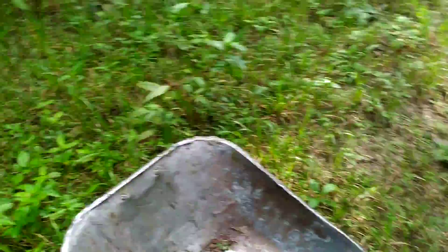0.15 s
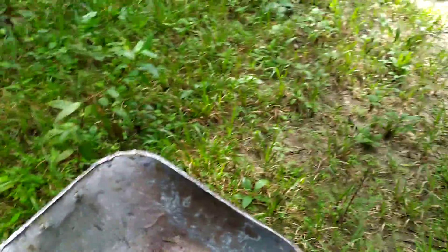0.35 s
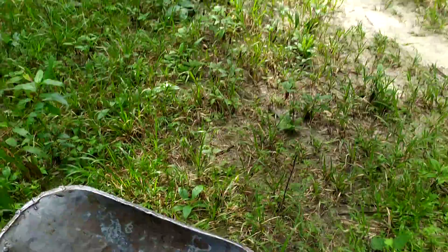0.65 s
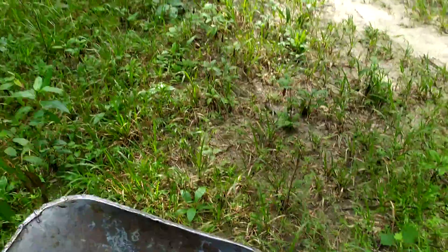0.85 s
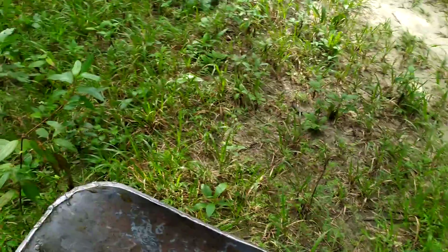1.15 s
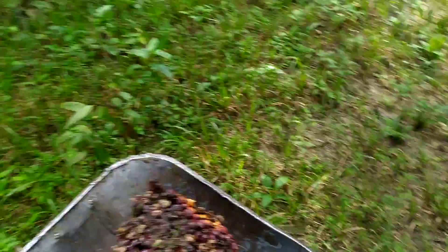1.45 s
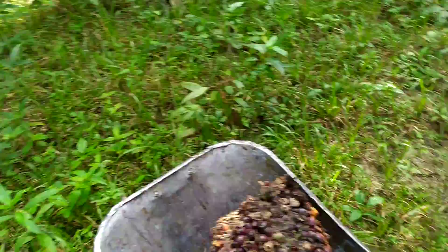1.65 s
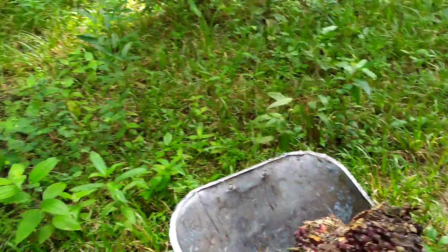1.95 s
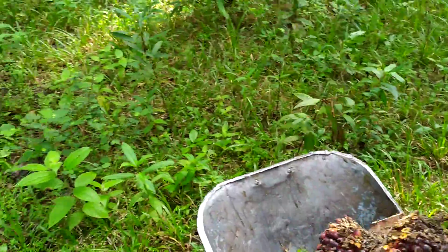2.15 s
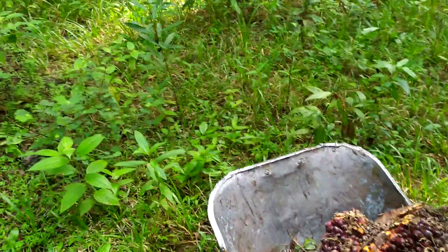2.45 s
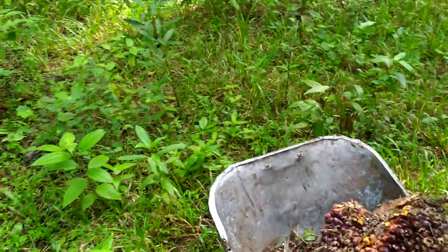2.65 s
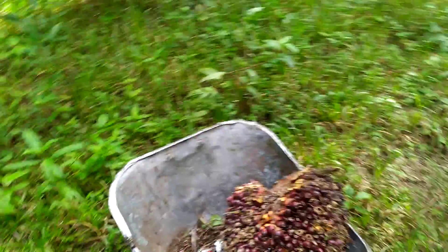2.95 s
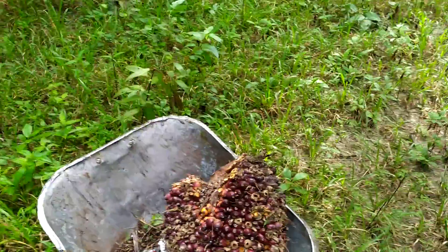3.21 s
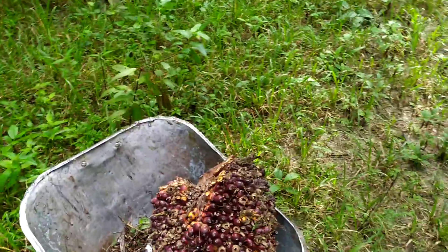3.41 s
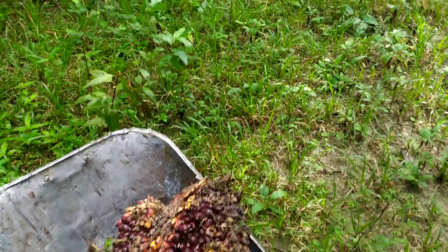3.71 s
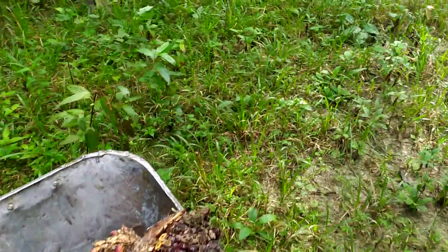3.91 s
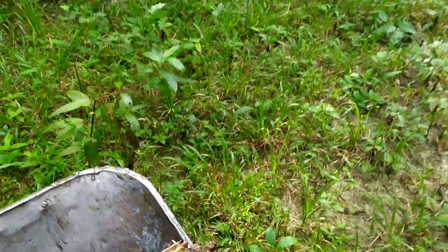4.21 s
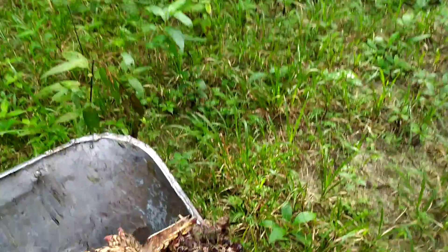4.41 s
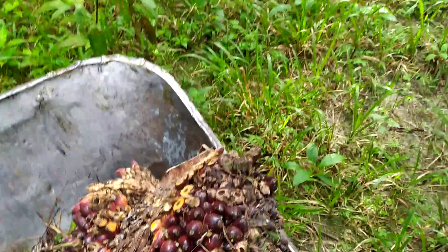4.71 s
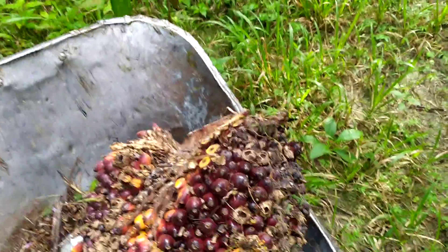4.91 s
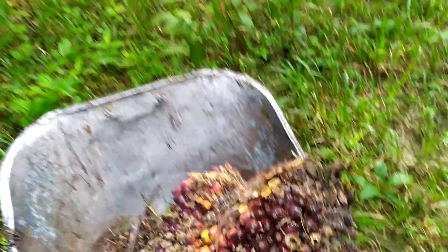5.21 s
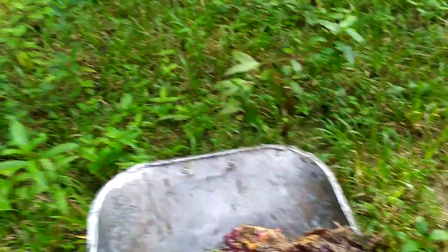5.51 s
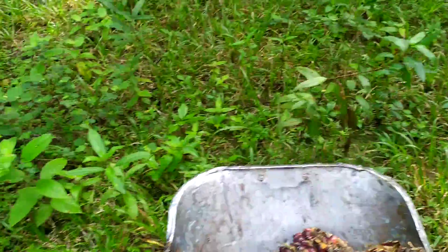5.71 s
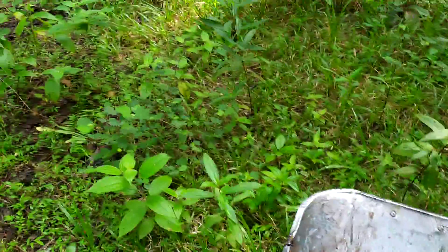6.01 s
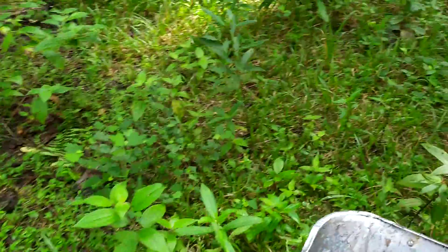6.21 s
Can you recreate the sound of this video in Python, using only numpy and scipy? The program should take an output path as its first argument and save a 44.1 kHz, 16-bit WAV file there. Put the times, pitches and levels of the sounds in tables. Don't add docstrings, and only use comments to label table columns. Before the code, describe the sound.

Outdoors in grass, loads bang into a hollow metal barrow with rattling fruit and grit, followed by a bright ringing tool clank and soft leafy swishes.

```python
import sys
import numpy as np
from scipy import signal
from scipy.io import wavfile
from scipy.ndimage import uniform_filter1d

SR = 44100
rng = np.random.default_rng(int(sys.argv[2]) if len(sys.argv) > 2 else 0)


def to_wav(sig):
    pcm = np.clip(np.atleast_2d(sig), -1, 1) * 32767
    pcm = np.round(pcm).astype(np.int16)
    wavfile.write(sys.argv[1], SR, pcm.T)


def invert_db(x):
    u = np.asarray(x, float) / 20
    return 10 ** u


N = 280476

# f/Hz, level/dB, ring time as a share of the blow's
TRAY_MODES = [(143.4, -11.5, 4.1), (163.2, -0.5, 0.65), (191, -3, 0.84), (212.3, -3.5, 1.4),
              (251, -11.5, 0.4), (258, 2.5, 0.45), (310, -11, 1.32), (355.8, -6, 1.12), (403.4, 0, 0.47),
              (451.3, -9.5, 0.71), (494, -13, 0.69), (569.6, -9, 0.51), (639, -11.5, 0.91),
              (704.3, -10, 0.51), (744, -10, 0.67), (807.4, -16, 0.83), (907, -19.5, 0.51),
              (1047, -21, 0.52), (942.3, -9, 0.51), (1180, -12.5, 0.35), (1390, -14.5, 0.36),
              (1550, -30, 0.68)]
# f/Hz, likeness (1 = the same, 0 = unrelated)
LIKENESS = [(35, 0.52), (70, 0.84), (150, 0.98), (300, 0.99), (600, 0.82), (1200, 0.45), (2500, -0.043),
            (6000, 0.15), (14000, -0.071)]
# t/s, tap level/dB, tilt/(dB per octave), left-right/dB
SNAPS = [(0.5945, -12, -1, 0), (0.9925, -29.5, -0.5, 5), (1.122, 2, 0, 5), (1.1266, -3, -4.5, -19),
         (1.4581, -42.5, -10, -2), (1.496, -28, 6, 2), (1.5864, -34, -2, 3.5), (1.5968, -28, 0.5, -4),
         (1.645, -28, 2.5, 0), (1.6784, -26.5, 1, -1), (1.691, -19.5, 3, 4), (1.7614, -37, -6, 1),
         (1.8442, -26.5, 1, 15), (1.8519, -20.5, -1, -4), (1.933, -42.5, -5, -1), (1.952, -39, 11, 1),
         (1.9979, -28.5, 0, 1.5), (2.1193, -34, -3, 3), (2.1805, -41, -6, 0), (2.2059, -24.5, 2, 9),
         (2.2614, -27, 1.5, 3), (2.3275, -31.5, -5.5, -2), (2.592, -29, -2, 2), (2.9403, -38, 8.5, -1),
         (2.9748, -40, 4, -2), (3.7782, -50.5, -2.5, 0), (4.4413, -2, 6.5, 38), (4.7476, -35, -9, 3.5),
         (5.8297, -68.5, -14, -3), (6.0964, -34.5, 7, 2.5)]
# t/s, level/dB, smothering starts t/s, time to set in/s, loss away from 2.3 kHz/(dB per octave)
TOOL_BLOWS = [
    (4.072, -20, 4.2, .005, 0),
    (4.441, -11, 4.97, .2, 0),
    (4.222, -27, 4.3, .005, -18),
]


def rms_one(x):
    return x / np.sqrt(np.mean(x ** 2) + 1e-20)


def at_hz(points, hz):
    table_hz, values = np.array(points)[:, 0], np.array(points)[:, 1]
    return np.interp(np.log(hz), np.log(table_hz), values)


def likeness_at(hz):
    return np.clip(at_hz(LIKENESS, hz), -1, 1)


def drift(rate_hz):
    r = np.exp(-80 * np.pi * rate_hz / SR)
    wander = signal.lfilter([1], [1, -2 * r, r * r], rng.standard_normal(N // 40 + 2002))
    return rms_one(wander[2000:])


def filled(slow):
    return np.interp(np.arange(N) / 40, np.arange(len(slow)), slow)


def swells(rows, floor_db):
    t = np.arange(N // 40 + 2) * 40 / SR
    power = sum(invert_db(2 * db - 20 * ((t - s) / fall_s) ** 2) for s, db, fall_s, *_ in rows)
    return filled(10 * np.log10(power + invert_db(2 * floor_db)))


def add(out, s, sound):
    i = round(s * SR)
    out[..., i:i + sound.shape[-1]] += sound[..., :N - i]


def grit(per_s, spread_db):
    sizes = invert_db(spread_db * np.minimum(rng.exponential(1, (2, N)), 5)) * rng.standard_normal((2, N))
    hits = rng.random((2, N)) < per_s / SR
    return rms_one(sizes * hits + 1e-9)


def bands(drives, low_hz, top_hz, gain, step=1 / 2):
    out = 0
    edges = low_hz * 2 ** np.arange(0, np.log2(top_hz / low_hz) + .01, step)
    for k, (low, high) in enumerate(zip(edges, edges[1:])):
        band = signal.butter(2, [low, high], "band", fs=SR, output="sos")
        mid, side = signal.sosfilt(band, drives[k % 2])
        hz = np.sqrt(low * high)
        alike = likeness_at(hz)
        mid, side = np.sqrt(1 + alike) * mid, np.sqrt(1 - alike) * side
        out = out + gain(hz) * np.array([mid + side, mid - side])
    return out


def damped(hz, gains, t60, length_s):
    t = np.arange(round(length_s * SR)) / SR
    phase = np.outer(2 * np.pi * hz, t).astype(np.float32)
    decay = np.exp(np.outer(-np.log(1000) / t60, t).astype(np.float32))
    return gains.real @ (decay * np.sin(phase)) + gains.imag @ (decay * np.cos(phase))


def sides(hz, chance):
    return np.exp(.5j * np.arccos(likeness_at(hz)) * chance * [[1], [-1]])


def hiss(spectrum, drives, patchy_db, flicker_hz, layout, tilt_db=0):
    layouts = {"swish": (900, 17000, 1 / 2), "field": (131, 17000, 1 / 3), "rumble": (36, 150, 1 / 3)}
    low_hz, top_hz, step = layouts[layout]
    together = drift(3.0)

    def level(hz):
        flicker_db = patchy_db * (1.53 * together + drift(flicker_hz))
        return filled(invert_db(at_hz(spectrum, hz) + tilt_db * np.log2(hz / 8000) + flicker_db))
    return rms_one(bands(drives, low_hz, top_hz, level, step))


def field(white):
    # f/Hz, level/(dB per Hz)
    spectrum = [(71, -32), (120, -4.5), (231, -16), (355, -8.5), (789, -22), (3050, -18.5), (3950, -21.5),
                (4700, -6), (5080, -10.5), (5870, -4), (8840, -3), (9590, -27), (14200, -8), (15000, -13),
                (16000, -39)]
    return invert_db(-55.5) * hiss(spectrum, white, patchy_db=-1.4, flicker_hz=13.0, layout="field")


def insects(drive):
    choirs = [
        (4330, 4900, -70, 9.0, 1.5),
        (5620, 5950, -71, 6.4, 4.0),
        (6850, 7200, -73, 4.0, 2.0),
    ]
    wing_strokes_per_s, buzz_db = 91, 3.0
    out, t = 0, np.arange(N) / SR
    buzz = buzz_db * np.cos(2 * np.pi * wing_strokes_per_s * t)
    for low_hz, high_hz, db, per_s, depth_db in choirs:
        edges = signal.butter(4, [low_hz, high_hz], "band", fs=SR, output="sos")
        throb = depth_db * np.cos(2 * np.pi * per_s * (t - 3.1))
        out = out + invert_db(db + throb + buzz) * rms_one(signal.sosfilt(edges, drive))
    return out


def rumble(white):
    # f/Hz, level/(dB per Hz)
    spectrum = [(18, -35), (30, -3), (43, -8.5), (59, -7.5), (69, -2.5), (81, -24.5), (102, -17),
                (130, -22), (170, -52), (290, -120)]
    # t/s, level/dB, time to fall 10 dB/s
    jolts = [
        (0.0, -43.5, 0.073),
        (0.66, -40, 0.041),
        (1.12, -44, 0.23),
        (2.07, -63, 0.11),
        (2.48, -57.5, 0.083),
        (4.0, -49, 0.077),
        (4.11, -34, 0.071),
        (4.5, -48, 0.094),
        (4.94, -49, 0.1),
        (6.1, -71, 0.2),
    ]
    noise = hiss(spectrum, white, patchy_db=0.95, flicker_hz=4.0, layout="rumble")
    return invert_db(swells(jolts, floor_db=-60.5)) * noise


def rolling(t60):
    # t/s, level/dB
    busyness = [(0.0, -51.5), (0.5, -59.5), (0.74, -40.5), (1.031, -52), (1.252, -46), (1.332, -20.5),
                (1.47, -49.5), (2.36, -47.5), (2.699, -59), (3.449, -59.5), (3.72, -85), (4.09, -78),
                (4.23, -39.5), (4.5, -78), (4.6, -28), (4.941, -50.5), (5.6, -52), (6.36, -49)]
    roll_db = np.interp(np.arange(N) / SR, *np.transpose(busyness))
    taps, out = grit(900.0, spread_db=2), 0
    for k, (hz, level_db, share) in enumerate(TRAY_MODES):
        r, w = invert_db(-60 / (t60 * share * SR)), 2 * np.pi * hz / SR
        ring = signal.lfilter([0, np.sin(w)], [1, -2 * r * np.cos(w), r * r], taps)
        alike = at_hz(LIKENESS, hz)
        mid, side = np.sqrt(1 + alike) * ring[k % 2], np.sqrt(np.abs(1 - alike)) * ring[1 - k % 2]
        out = out + invert_db(0.93 * level_db) * np.array([mid + side, mid - side])
    murmur = rms_one(out)
    deep = signal.sosfiltfilt(signal.butter(2, 270, fs=SR, output="sos"), murmur)
    light = np.clip((-45.5 - roll_db) / 8.0, 0, .9)
    return invert_db(roll_db) * (murmur - light * deep)


def swish(husks):
    # f/Hz, level/(dB per Hz)
    spectrum = [(530, -35), (900, -17), (1190, -13), (1510, -12), (1850, -12), (5750, -14), (9200, -9.5),
                (15100, -15.5), (16000, -19)]
    # t/s, level/dB, time to fall 10 dB/s, tilt/(dB per octave)
    sweeps = [(0.2, -66, 0.66, 0.5), (0.74, -57, 0.23, 2), (1.28, -56.5, 0.2, -2), (2.0, -70, 0.87, -1),
              (3.6, -73.5, 0.12, 1), (4.36, -68.5, 0.15, -2), (5.2, -71, 0.35, -0.5),
              (5.56, -61, 0.21, 0.5), (5.68, -56, 0.093, 1), (5.97, -64, 0.17, -1), (6.2, -57, 0.14, 2),
              (6.33, -59, 0.17, 3)]
    tilt_db = np.interp(np.arange(N // 40 + 2) * 40 / SR, *np.transpose(sweeps)[[0, 3]])
    leaves = hiss(spectrum, husks, patchy_db=1.5, flicker_hz=4.5, layout="swish", tilt_db=tilt_db)
    catching_db = 2.5 * filled(drift(35.0))
    return invert_db(swells(sweeps, floor_db=-79.5) + 14.5 + catching_db) * leaves


def blows():
    # t/s, peak level/dB, t60/s, upper knock/dB
    landings = [(0.596, -4, 0.57, -8.5), (0.664, -20.5, 0.29, -5), (0.755, -19.5, 0.14, -24),
                (0.893, -27, 0.23, -17.5), (0.936, -38, 0.34, -23), (1.111, -9, 0.24, -16),
                (1.14, -4.5, 0.17, -10), (1.167, -4, 0.44, -11.5), (1.316, -7.5, 0.25, -15),
                (1.336, -15, 0.11, -7), (1.379, -18, 0.24, -4.5), (1.4592, -12.5, 0.076, -1),
                (2.42, -27, 0.32, -15), (4.08, 0.5, 0.32, -16), (4.215, -21.5, 0.45, -7),
                (4.313, -28.5, 0.27, -10.5), (4.44, -14.5, 0.79, -3), (4.45, -5.5, 0.23, 3),
                (4.464, -8.5, 0.56, -4), (4.512, -10, 0.14, 8), (4.553, -3.5, 0.22, -12),
                (4.604, -11, 0.23, -7.5), (4.68, -18, 0.23, -3), (4.722, -18, 0.48, -10.5),
                (4.747, -24, 0.32, 4), (4.789, -22.5, 0.52, -6), (4.93, -34, 0.44, -7),
                (1.182, -10, 0.16, -6), (1.2, -7.5, .11, -12), (1.221, -11.5, 0.19, -4),
                (1.244, -7, 0.099, -7), (1.269, -11, 0.12, -4.5), (0.696, -19, 0.14, -16),
                (0.721, -22.5, 0.13, -14)]
    # t/s, peak level/dB, colour f/Hz
    knocks = [(0.591, -21, 526), (0.989, -41, 620), (1.358, -18.5, 595), (1.591, -40, 383),
              (1.689, -33, 196), (1.758, -35.5, 320), (1.246, -14, 870), (1.85, -25.5, 366),
              (1.879, -32, 167), (1.995, -41, 310), (2.056, -41, 187), (2.116, -50, 388),
              (2.179, -36.5, 383), (2.209, -22.5, 398), (2.231, -25, 385), (2.26, -27, 474),
              (2.327, -30.5, 406), (2.594, -35, 370), (4.07, -16.5, 1130), (4.524, -7.5, 473),
              (5.222, -43.5, 367), (5.358, -39, 157), (5.602, -30, 380), (5.623, -34.5, 805),
              (5.696, -29.5, 416), (5.827, -42, 796), (6.214, -32.5, 258), (6.237, -36, 403),
              (5.56, -41.5, 334), (5.582, -38.5, 372), (1.095, -33.5, 450), (1.523, -38.5, 414),
              (3.49, -55, 503), (3.61, -57, 498), (3.813, -59.5, 520), (1.29, -23.5, 900), (1.4, -27, 930),
              (1.481, -27.5, 333), (6.26, -40, 890), (4.085, -19, 300), (4.12, -16.5, 650),
              (4.575, -23, 590), (4.83, -31, 500), (4.86, -28, 204), (4.9, -30, 203), (4.748, -25.5, 810)]
    empty_hz, loaded_hz, loaded_s = 197, 249.8, 1.1
    heavy = [(s, db, empty_hz if s < loaded_s else loaded_hz, t60, knock_db)
             for s, db, t60, knock_db in landings]
    light = [(s, db, hz, 0.2 + 0.1 * np.log2(hz / 350), -11.5) for s, db, hz in knocks]
    landed = np.sort([row[0] for row in heavy] + [N / SR])
    same_blow_s = 0.04
    return [(*row, landed[landed > row[0] + same_blow_s][0] - row[0]) for row in heavy + light]


def thuds(width_oct, spread_db, contact_cycles, knock_hz, knock_share):
    smother_s = 0.006
    out, (hz, level_db, share) = np.zeros((2, N)), np.transpose(TRAY_MODES)
    strikes = blows()
    chance = rng.standard_normal((len(strikes), 4, len(hz)))
    upper = hz > knock_hz
    upper_share = np.where(upper, knock_share * (knock_hz / hz) ** 0.4, 1)
    for (s, db, centre_hz, t60, knock_db, free_s), (strength, detune, side, sign) in zip(strikes, chance):
        mode_gain = invert_db(level_db + spread_db * strength)
        boom = mode_gain / (1 + (np.log2(hz / centre_hz) / width_oct) ** 2) ** 2
        knock = mode_gain * upper
        gains = boom / np.linalg.norm(boom) + invert_db(knock_db - 0.5) * knock / np.linalg.norm(knock)
        gains = invert_db(db - 1.5) * np.exp(2j * sign) * gains * sides(hz, side)
        t60 = np.clip(t60, .02, .5)
        ring = damped(hz * (1 + 0.021 * detune), gains, t60 * share * upper_share, 0.56 * t60)
        t = np.arange(ring.shape[1]) / SR
        contact = 1 - np.exp(-t * centre_hz / contact_cycles)
        choked = np.exp(-np.maximum(t - free_s, 0) / smother_s)
        fade = 1 - np.linspace(0, 1, len(t)) ** 4
        add(out, s, ring * contact * choked * fade)
    return out


def ticks(cycles, shortest_s):
    out, spread_hz = np.zeros((2, N)), np.geomspace(450, 15000, 24)
    chance = rng.standard_normal((len(SNAPS), 4, len(spread_hz)))
    for (s, db, tilt_db, pan_db), (strength, detune, side, sign) in zip(SNAPS, chance):
        dull_db = -11.5 - 2.07 * tilt_db
        hz = spread_hz * (1 + 0.15 * np.tanh(detune))
        db, pan_db = min(db, -9), np.clip(pan_db, -9, 9)
        level_db = db - 10.0 + (dull_db + 2.0) * np.log2(8000 / hz) / 2.5 + 1.9 * strength
        gains = np.sign(sign) * invert_db(level_db + pan_db * np.array([[.5], [-.5]])) * sides(hz, side)
        add(out, s, damped(hz, gains, shortest_s + cycles / hz, .05))
    return out


def bursts():
    # t/s, peak level/dB, tilt/(dB per octave), t60/s
    showers = [(0.5952, -4.5, 1.5, 0.24), (1.1112, -30, -13.5, 0.043), (1.1197, -2.5, -2.5, 0.3),
               (1.2433, -18, -2, 0.09), (1.329, -21, -1.5, 0.44), (1.3553, -19, -5.5, 0.14),
               (2.2044, -23, -2, 0.21), (2.2381, -20, -2, 0.16), (4.0722, -5.5, -1, 0.34),
               (4.215, -26, -2, 0.47), (4.444, -19, -12, 0.08), (4.514, -6, -3, 0.31),
               (4.6876, -31.5, -8.5, 0.085), (5.699, -35, 7.5, 0.21), (6.1885, -33.5, 3.5, 1),
               (6.2354, -32, -5.5, 0.23)]
    puffs = [(s, min(db - 2, -25.5), tilt_db, 0.17, pan_db) for s, db, tilt_db, pan_db in SNAPS]
    return [(*shower, 0.5) for shower in showers] + puffs


def cracks(husks):
    all_bursts = bursts()

    def envelope(hz):
        power = np.zeros((2, N))
        for s, db, tilt_db, t60, pan_db in all_bursts:
            t60 = np.clip(t60, .004, .8) * (hz / 4000) ** -.15
            t = np.arange(round(t60 * SR)) / SR
            colour_db = tilt_db * np.log2(hz / 5000) - 7.0 * max(np.log2(hz / 9000), 0)
            level_db = db - 12 + colour_db + pan_db * np.array([[.5], [-.5]])
            add(power, s, invert_db(2 * level_db) * invert_db(-120 * t / t60) * np.minimum(t / .0006, 1))
        return np.sqrt(power)
    return bands(husks, 530, 17000, envelope)


def tool(rattle_db):
    tones_hz = [1028, 1478, 1536, 1924, 2035, 2655, 3115, 3402, 3736, 4199, 5110, 6484, 6603, 7171, 7589,
                7730, 8847, 9886, 10010, 10713, 11470, 1479.3, 13492, 14000, 14390, 14650, 14980, 15247]
    # level/dB, t60/s
    on_load = [(7, 0.29), (-17, .3), (-5, 0.3), (-26, .3), (2, 0.44), (-7, 0.6), (-39.5, .2), (-22, 0.4),
               (-6, 0.4), (-21, 0.24), (-9, 0.17), (-14, 0.66), (-26, 0.41), (-25, .2), (-8, 0.22),
               (-18, 0.54), (-19, 0.31), (-12, 0.57), (-28, 0.17), (-13, 0.44), (-4, .2), (-30, .1),
               (-11, 0.24), (-21, .15), (-3, 0.33), (-26, .15), (-28.5, .1), (-7, .1)]
    # level/dB, t60/s, gain at the bounce/dB
    struck_free = [(-27.5, 0.22, -9), (-27.5, 2.4, 11.5), (-38, 0.87, 0), (-6.5, 1.8, -5), (-20, 0.44, 17),
                   (-27, 0.17, 0), (-8, 0.9, -9), (-24, 0.9, 2), (-36, 0.9, 0), (-23, 0.6, 0),
                   (-12, 0.2, -4), (-12, 0.6, 0), (-14, 0.6, 0), (-20, 0.6, 2), (-12, 0.3, 0),
                   (-14, 0.15, 0), (-2, 0.35, -11), (-5, 0.41, -10), (-12, 0.26, -6), (-9, 0.55, -6),
                   (-24, 0.13, 0), (-30, 2.6, 10), (-5, 0.3, -4), (-8.5, 0.41, -2), (-6, 0.2, 3),
                   (-12, 0.35, -7), (-34, .2, 0), (-11.5, 0.2, -14)]
    bounce_s, bounce_ease_s = 4.5, 0.0031
    out, hz = np.zeros((2, N)), np.array(tones_hz)
    longest_s = np.where(hz < 2800, 3, .95 * (3000 / hz) ** .6)
    for modes, (s, db, end_s, ease_s, dull_db) in zip([on_load, struck_free, on_load], TOOL_BLOWS):
        level_db, t60, *bounce_db = np.transpose(modes)
        t60 = np.clip(t60, .03, longest_s)
        after = invert_db(bounce_db[0] if bounce_db else 0 * hz)
        gains = invert_db(db + level_db + dull_db * abs(np.log2(hz / 2300))) * sides(hz, rng.standard_normal(len(hz)))
        for group in np.arange(len(hz)).reshape(-1, 4).T:
            ring = damped(hz[group], (gains * after)[:, group], t60[group], end_s - s + ease_s + 0.2)
            change = damped(hz[group], (gains * (1 - after))[:, group], t60[group], .1)
            since_bounce = s + np.arange(SR // 10) / SR - bounce_s
            ring[:, :SR // 10] += change / (1 + np.exp(since_bounce / bounce_ease_s))
            late = np.maximum(np.arange(ring.shape[1]) / SR + s - end_s, 0)
            smother_db = -170 * late ** 2 / (late + ease_s)
            waver_db = rattle_db * filled(drift(20.0))[:len(late)]
            add(out, s, ring * invert_db(smother_db + waver_db))
    return out


def shimmer(level_db, t60s):
    out = np.zeros((2, N))
    for (s, db, *_), blow_db, t60 in zip(TOOL_BLOWS, level_db, t60s):
        strength, side, damping = rng.standard_normal((3, 120))
        hz = np.geomspace(1200, 15500, 120) * rng.uniform(.99, 1.01, 120)
        spread = invert_db(3 * strength) * (hz < 11000) + invert_db(3 * strength - 4) * (hz > 13200)
        lasting = t60 * (hz / 4000) ** -.3 * invert_db(2 * damping)
        add(out, s, damped(hz, invert_db(db + blow_db) * spread * sides(hz, 2 * side), lasting, 0.54))
    return out


def scene():
    white = rng.standard_normal((2, 2, N))
    husks = [grit(9000.0, spread_db=1.0), grit(6000.0, spread_db=-0.5)]
    around = field(white) + insects(white[0, :, ::-1]) + rumble(white[::-1])
    tray = rolling(t60=0.077)
    tray += thuds(width_oct=0.74, spread_db=5.0, contact_cycles=0.07, knock_hz=430, knock_share=0.92)
    tray = signal.sosfilt(signal.butter(2, 80, "high", fs=SR, output="sos"), tray)
    barrow = tray + ticks(cycles=13.0, shortest_s=0.005) + cracks(husks)
    barrow += tool(rattle_db=1.9) + shimmer(level_db=[-18, -17], t60s=[.17, .2])
    return around + swish(husks[::-1]) + barrow


def low_pass(x):
    return signal.sosfilt(signal.butter(12, 16810, fs=SR, output="sos"), x)


def record(dry):
    limit_db, recovery_db_per_s, squeeze = -14, 43.5, 0.55
    level_db = 10 * np.log10(np.maximum(uniform_filter1d(np.mean(dry ** 2, axis=0), 441), 1e-12))
    ramp_db = recovery_db_per_s * np.arange(N) / SR
    held_db = np.maximum.accumulate(level_db + ramp_db) - ramp_db
    cut_db = signal.lfilter([.005], [1, -.995], squeeze * np.maximum(held_db - limit_db, 0))
    x = 0.66 * np.tanh(dry * invert_db(-cut_db) / 0.72)
    x = signal.sosfilt(signal.butter(2, 42, "high", fs=SR, output="sos"), x)
    top = signal.sosfilt(signal.butter(2, 10000, "high", fs=SR, output="sos"), x)
    left_lean_db = 2
    x = x + top * (invert_db(left_lean_db * np.array([[.5], [-.5]])) - 1)
    x = signal.sosfilt(signal.cheby2(12, 70, 17200, fs=SR, output="sos"), x)
    return low_pass(x)


dry = scene()
out = record(dry)
to_wav(out)
```